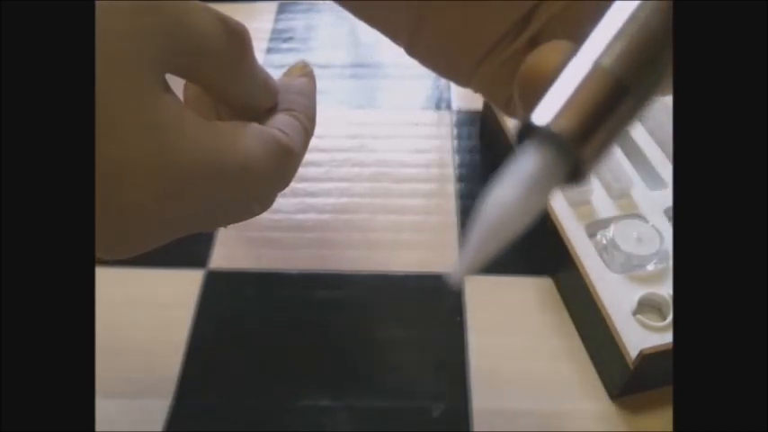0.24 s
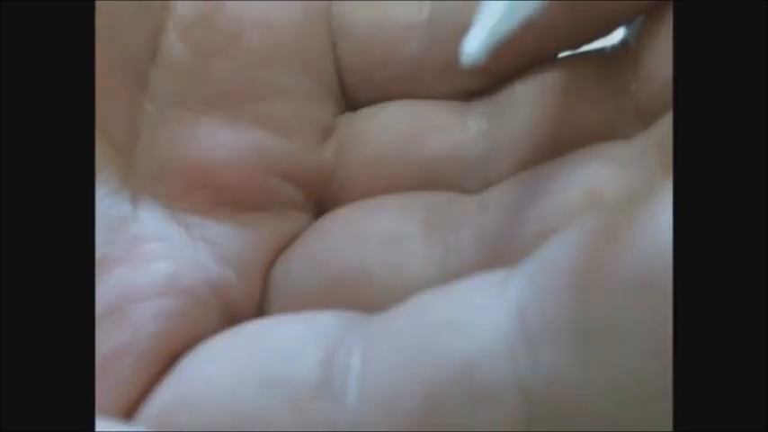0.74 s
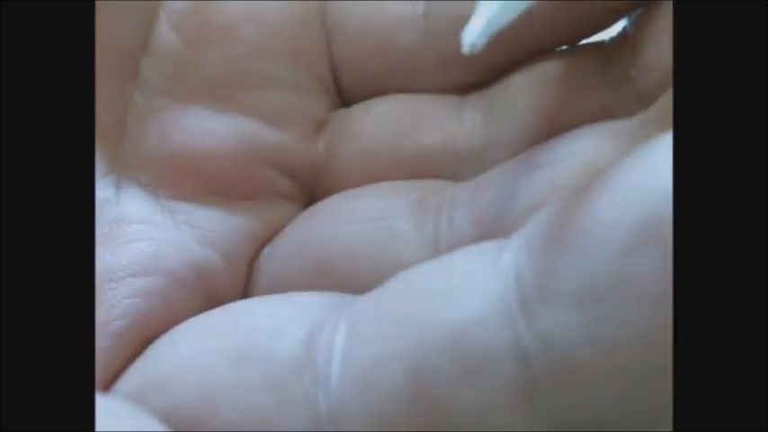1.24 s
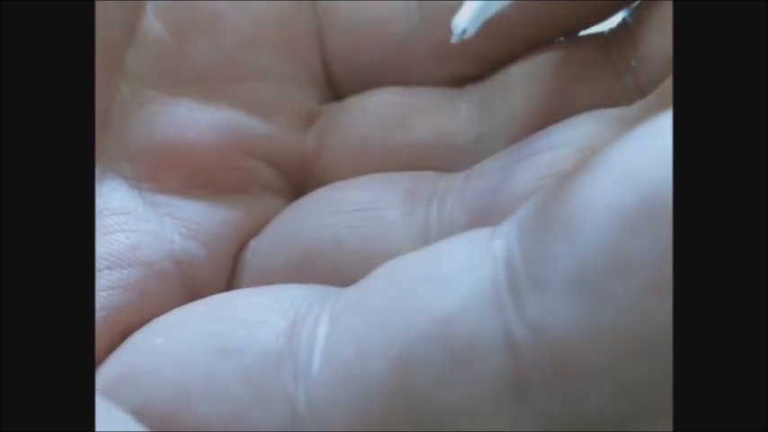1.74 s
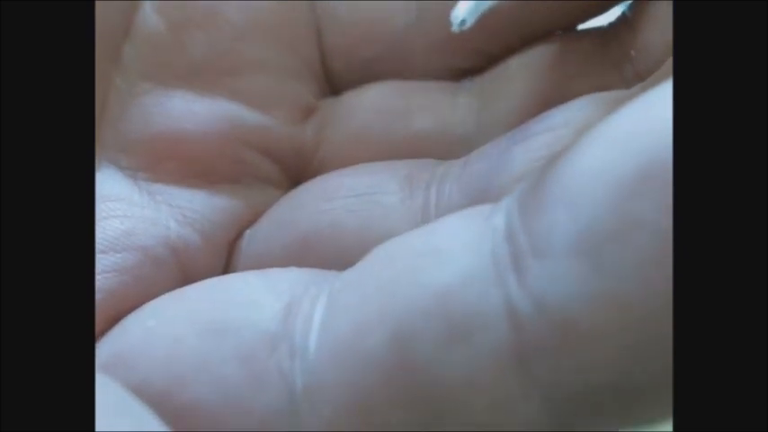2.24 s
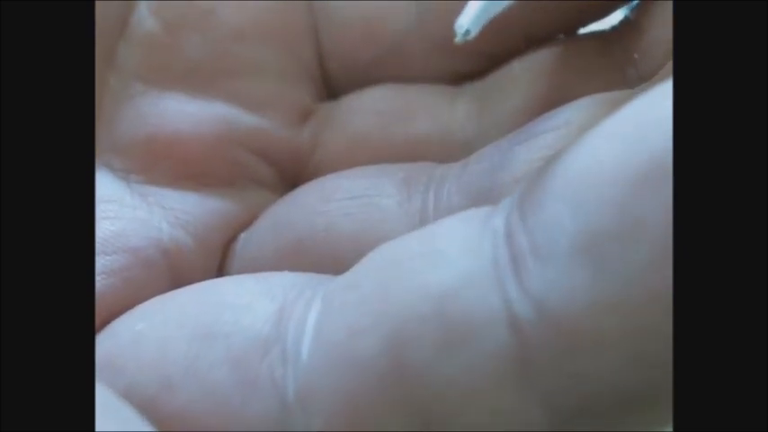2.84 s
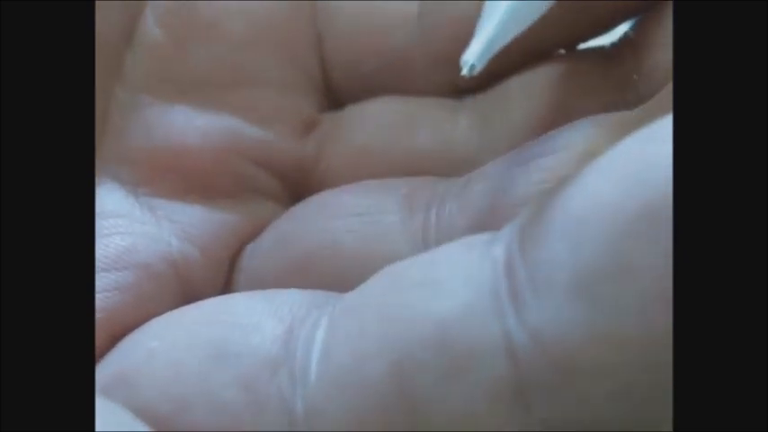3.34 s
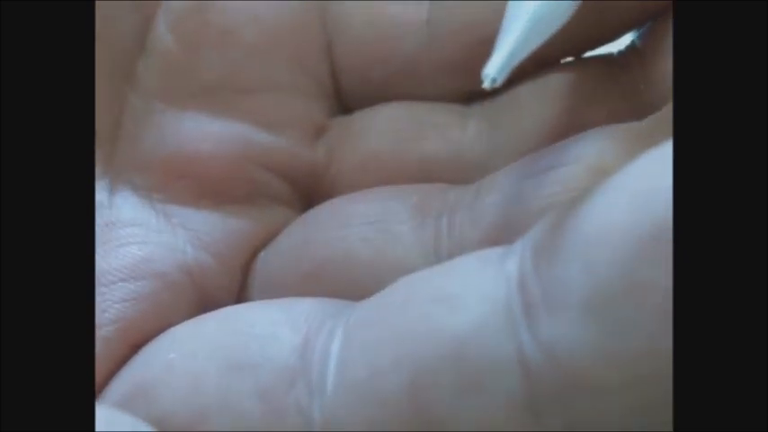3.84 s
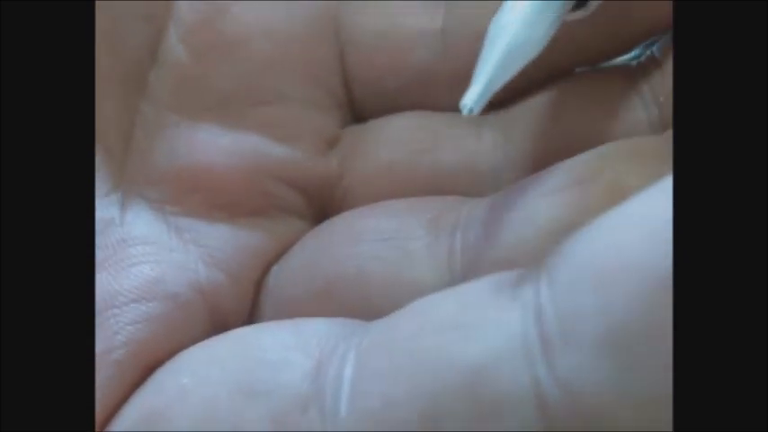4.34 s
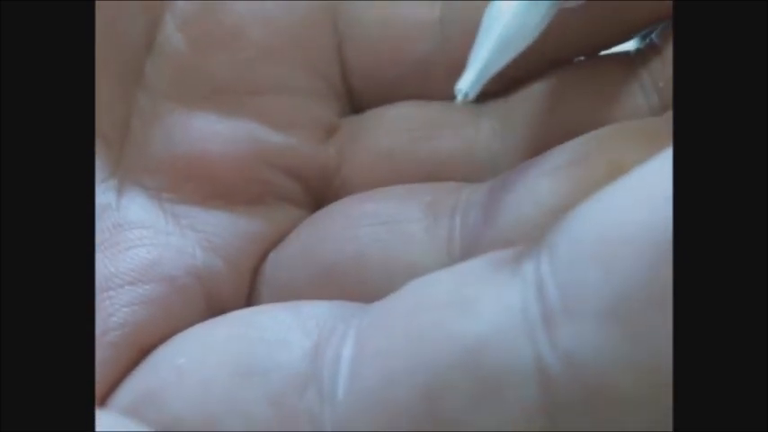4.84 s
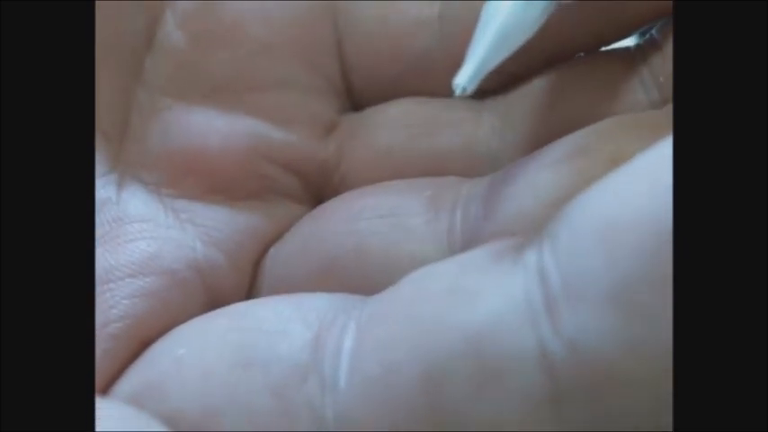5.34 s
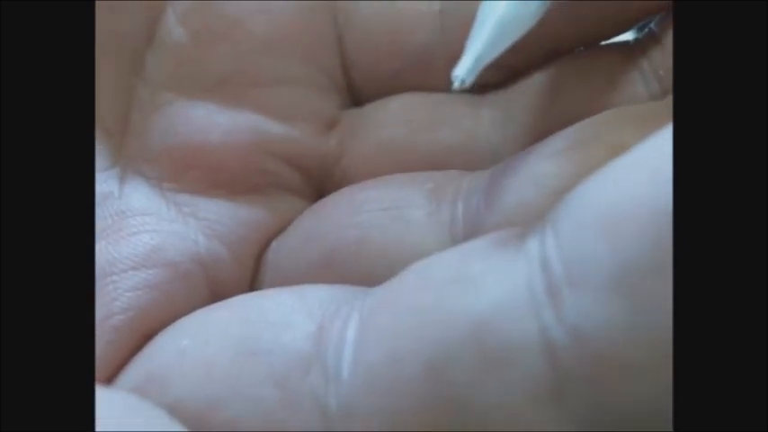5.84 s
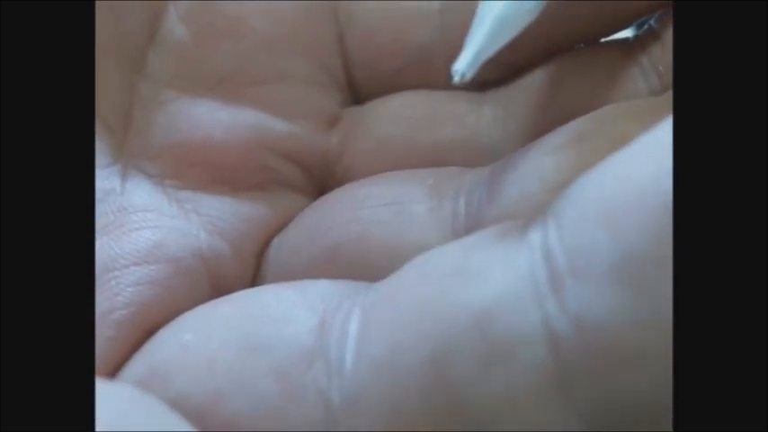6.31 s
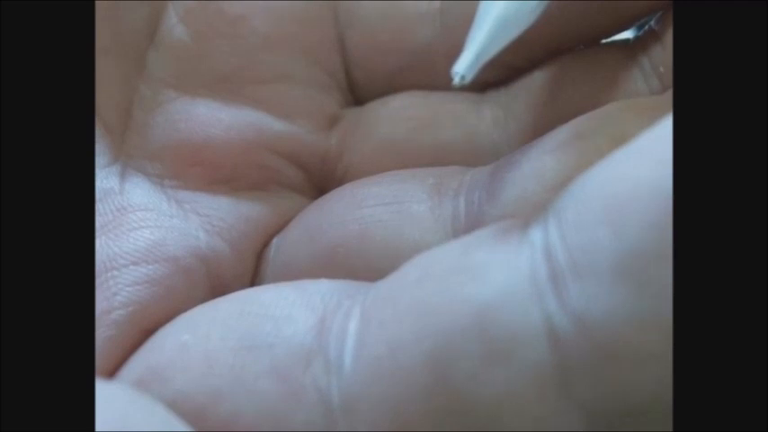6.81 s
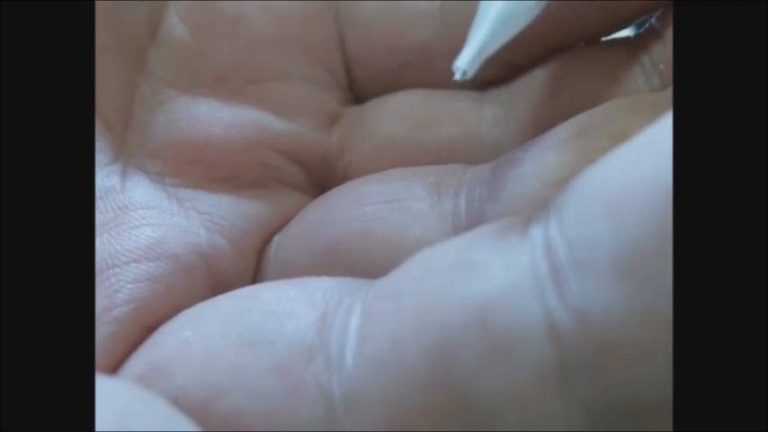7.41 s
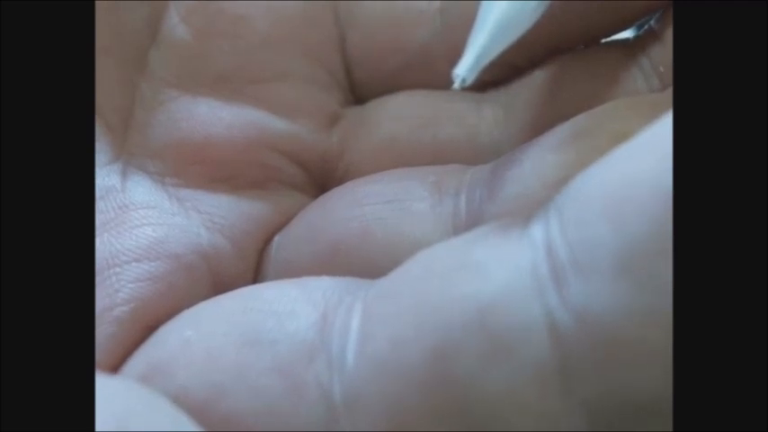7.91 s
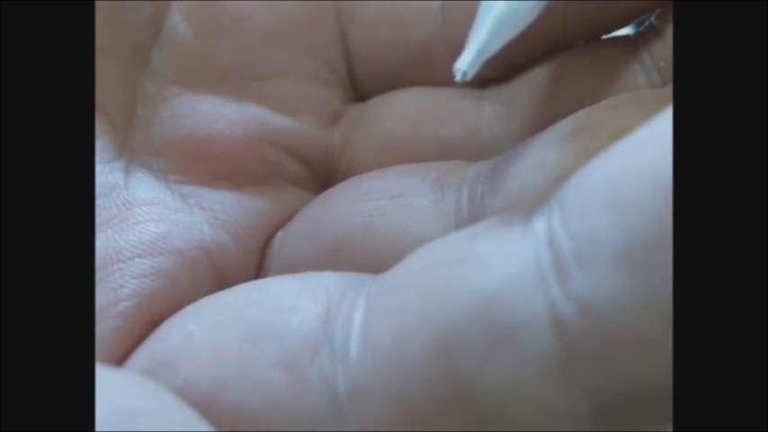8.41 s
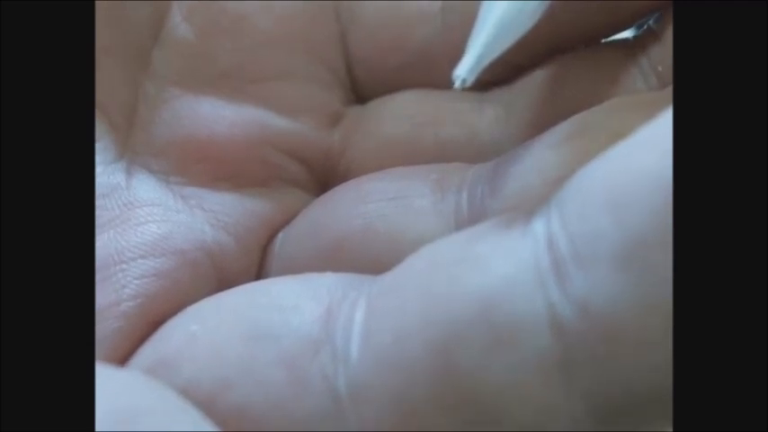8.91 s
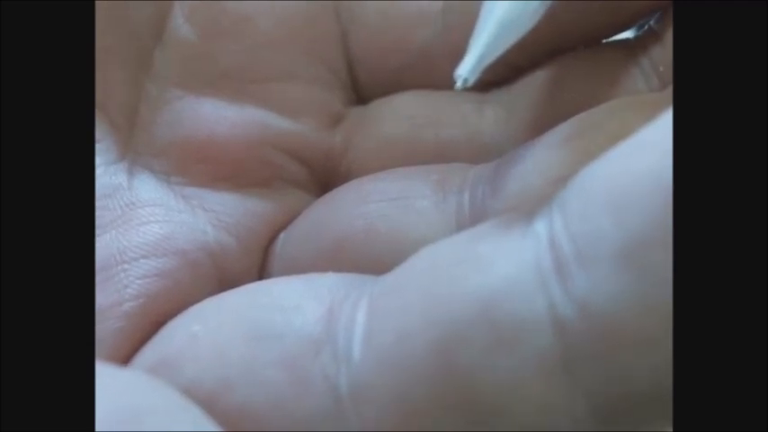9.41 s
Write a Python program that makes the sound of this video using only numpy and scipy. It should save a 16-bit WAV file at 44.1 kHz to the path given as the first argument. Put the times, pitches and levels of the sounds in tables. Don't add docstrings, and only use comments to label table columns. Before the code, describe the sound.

Thin, rattling motor buzz from a handheld pen machine, switched on and off abruptly in four runs over low indoor appliance hum.

```python
import sys
import numpy as np
from scipy import signal
from scipy.fft import rfft, irfft
from scipy.io import wavfile
from scipy.ndimage import uniform_filter1d

SR = 44100
rng = np.random.default_rng(int(sys.argv[2]) if len(sys.argv) > 2 else 0)


def invert_db(level):
    return 10 ** (np.asarray(level, dtype=float) / 20)


def to_wav(sig):
    pcm = np.clip(np.atleast_2d(sig), -1, 1) * 32767
    pcm = np.round(pcm).astype(np.int16)
    wavfile.write(sys.argv[1], SR, pcm.T)


N = 426006
TIME = np.arange(N) / SR

# on_s, off_s, spin_up_s, surplus_hz (extra cam speed of the rested motor), buzz_db
RUNS = [
    (.581, 1.52, .001, 1.25, -41.5),
    (1.910, 3.54, .025, 3.15, -41),
    (4.630, 7.69, .027, 2.6, -40),
    (7.963, 9.9, .029, 1.22, -40),
]


def rms_one(x):
    return x / np.sqrt(np.mean(x ** 2) + 1e-20)


def drift(rate):
    r = np.exp(-80 * np.pi * rate / SR)
    slow = signal.lfilter([1], [1, -2 * r, r * r], rng.standard_normal(N // 40 + 2002))[2000:]
    return np.interp(np.arange(N) / 40, np.arange(len(slow)), rms_one(slow))


def resonate(x, hz, width):
    r = np.exp(-np.pi * width / SR)
    gain = (1 - r * r) / 2
    ring = [1, -2 * r * np.cos(2 * np.pi * hz / SR), r * r]
    return signal.lfilter(np.array([1, 0, -1]) * gain, ring, x + 1e-18)


def coloured(spectrum):
    hz, level_db = np.transpose(spectrum)
    grid = np.maximum(np.fft.rfftfreq(N, 1 / SR), 1)
    shape = invert_db(np.interp(np.log(grid), np.log(hz), level_db))
    return rms_one(irfft(rfft(rng.standard_normal(N)) * shape, N))


def pen():
    # start_s, strength (against a plain knock)
    slack_knocks = [
        (.587, 0.87),
        (1.921, 1),
        (4.665, 1.1),
        (4.673, 0.76),
        (7.980, 0.1),
    ]
    cam_hz = 159.92
    surplus_hz, buzz_db, press = run_state()
    share = speed_share()
    turns = np.cumsum(share * (cam_hz + surplus_hz) * (1 + .0005 * drift(30))) / SR
    whole = np.round(turns).astype(int)

    strength, late = rng.standard_normal((whole.max() + 2, 2)).T
    strength = strength + .4 * (-1.) ** np.arange(len(strength))
    stroke = np.interp(turns, np.arange(len(strength)), strength)
    passed = turns - .003 * np.clip(late[whole], -3, 3) - whole > 0
    knocks = np.diff(passed * 1., prepend=1).clip(0)
    knocks *= invert_db(2.6 * np.minimum(strength[whole], 2)) * share ** 1.5
    knocks[[round(s * SR) for s, _ in slack_knocks]] = [size for _, size in slack_knocks]

    angle = 2 * np.pi * (turns - .03)
    swell = invert_db(2.5 * np.cos(angle) + 1.04 * np.cos(2 * angle) + 0.23 * stroke)
    lead_turns, hold_turns, fall_db_per_turn = .4, .5, 18.0
    past_hold = np.maximum((turns + lead_turns) % 1 - hold_turns, 0)
    slide = invert_db(0.81 * stroke - fall_db_per_turn * past_hold)
    grains = invert_db(2.0 * np.minimum(rng.exponential(1, (2, N)), 4)) * rng.standard_normal((2, N))
    grains *= invert_db(2.5 * (1 - share) * drift(160))
    rattles = np.vstack([rms_one(grains * stir * (share > 0)) for stir in (swell, slide)])

    tone = invert_db(-11) * orders(turns, stroke, surplus_hz, press, share) * share ** 2
    rattle = invert_db(-2.0) * rms_one(pen_body(knocks, rattles * share ** 2.02, TIME < 1.7))
    return invert_db(buzz_db) * (tone + rattle + shudder(grains[0], share))


def run_state():
    settle_s, press_s = .75, .1
    on, off, _, surplus_hz, buzz_db = np.transpose(RUNS)
    run = np.maximum(np.searchsorted(on, TIME) - 1, 0)
    surplus = surplus_hz[run] * np.exp(-np.maximum(TIME - on[run], 0) / settle_s)
    return surplus, buzz_db[run], np.clip(1 - (off[run] - TIME) / press_s, 0, 1)


def speed_share():
    coast_s = .093
    share = np.zeros(N)
    for on, off, rise, *_ in RUNS:
        up = 1 - np.exp(-np.maximum(TIME - on, 0) / rise)
        share += up * np.clip(1 - np.maximum(TIME - off, 0) / coast_s, 0, 1)
    return share


def orders(turns, stroke, surplus_hz, press, share):
    # order (multiple of cam speed), first_grip_db, second_grip_db, third_grip_db
    order_levels = [(1, -9, -9.5, -10), (2, -12, -12, -13.5), (4, -11.5, -12, -12.5), (6, -27, -16.5, -21),
                    (7, -21, -18, -17.5), (8, -5.5, -4, -4.5), (9, -11.5, -12.5, -12.5), (10, -5, -4.5, -6),
                    (11, -13, -20, -17), (12, 1.5, -12, -5), (13, -10, 1.5, -4), (14, -2, 0.8, 1.5),
                    (15, 0, 2, -2), (16, 0.5, -0.8, -2), (17, -6.5, -8.5, -11.5), (19, -5, -6, -5),
                    (20, -16.8, -11, -14), (21, -6, -7, -10), (22, 3, 3.2, 2), (23, -0.5, -2, -1.5),
                    (25, -4, -2.5, -6.5), (26, -19, -18, -4.5), (29, -6, -3, -4), (32, -2.5, -6, -2.5),
                    (37, -8, -12, -12), (39, -3, -11, -16), (41, -9, -8, -7), (43, -21, -20, -8),
                    (45, -12, -12, -2), (56, -1, -2, -9)]
    # start_s, grip (number from 0)
    grips = [
        (0, 0),
        (1.3, 1),
        (2.9, 0),
        (3.27, 1),
        (4, 2),
    ]
    since, grip = np.transpose(grips)
    grip = grip.astype(int)[np.searchsorted(since, TIME, "right") - 1]
    held = uniform_filter1d(np.eye(3)[grip].T.copy(), size=4000, axis=1)
    out = np.zeros(N)
    lean = rng.normal(0, .2, 30)
    for (k, *grip_db), lag in zip(order_levels, lean):
        k = round(k)
        level_db = np.dot(grip_db, held)
        if k == 12:
            free_db = level_db + 0.5 * surplus_hz + 1 * drift(3.3)
            press_db = 3
            level_db = free_db + press * (press_db - free_db)
        if 11 < k < 18:
            lag += -0.6 * np.arctan((k - 14.6) / 0.38)
        else:
            lag += (1.1 if k > 17 else np.pi / 2) * (k % 2)
        halves = 1 + .2 * np.cos(np.pi * turns + 3 * lag) if k > 13 else 1
        level = invert_db(level_db + 1.0 * drift(1.6) - 2.2 * k * (1 - share))
        out += halves * level * np.cos(2 * np.pi * k * turns + lag)
    return out * invert_db(0.13 * stroke)


def pen_body(knocks, rattles, first):
    # pitch_hz, width_hz, knock_db, rattle_db
    body_near = [(1900, 230, -21, -36), (2670, 250, 5, 1.5), (3830, 460, -22, -1.5), (4860, 1130, 5, -3.5),
                 (6720, 650, -7, 1.5), (6940, 1000, 7.5, -18), (8700, 630, 6, -4), (10120, 1050, -12, -2.5),
                 (11800, 620, -10, -17), (13700, 4300, -18, -15), (15200, 970, -18, -10),
                 (9300, 120, -10, -17)]
    # pitch_hz, width_hz, knock_db, rattle_db
    body_held = [(2140, 230, -7, -15), (2587, 265, -30, -0.5), (4000, 1100, -54, -2.5),
                 (5230, 550, 5.5, -3), (6935, 560, 14, 0), (7510, 2100, 9, -30), (8830, 1330, -22, -3.5),
                 (10280, 1130, -6, -3.5), (11700, 210, -5, -1.5), (12300, 420, -16, -30),
                 (15750, 460, -16, -7), (8900, 64, -18, -4)]
    out, blows = np.zeros(N), np.flatnonzero(knocks)
    for body, grip in ((body_near, first), (body_held, ~first)):
        for k, (hz, width, knock_db, rattle_db) in enumerate(body):
            drive = invert_db(rattle_db) * rattles[k % 2 + 2 * (hz > 8400)]
            spread_db = rng.normal(0, 1.9, len(blows))
            drive[blows] += invert_db(knock_db + 12 + spread_db) * knocks[blows]
            out += (-1) ** k * resonate(drive * grip, hz, width)
    band = signal.butter(3, [1900, 14000], "band", fs=SR, output="sos")
    return signal.sosfilt(band, out)


def shudder(grains, share):
    hz, width_hz, level_db = 2300, 1300, -13
    shaking = rms_one(resonate(resonate(grains, hz, width_hz), hz, width_hz))
    return invert_db(level_db) * shaking * 7 * share ** 2 * (1 - share)


def ticks():
    # start_s, peak_db, crack_hz, crack_width_hz
    taps = [
        (4.1428, -44, 2400, 2000),
        (7.8348, -46, 6960, 6000),
    ]
    # low_hz, low_t60_s (time to fall 60 dB), upper_hz, upper_t60_s
    rings = [
        (1030, 0.043, 4500, 0.0077),
        (2690, 0.046, 2980, 0.018),
    ]
    out = np.zeros(N)
    for (s, peak_db, crack_hz, width), (hz, t60, upper_hz, upper_t60) in zip(taps, rings):
        age = np.maximum(TIME - s, 0)
        noise = resonate(resonate(rng.standard_normal(N), crack_hz, width), crack_hz, width)
        crack = 0.5 * rms_one(noise) * np.exp(-age / 0.0018)
        low = 0.6 * np.sin(2 * np.pi * hz * age) * invert_db(-60 * age / t60)
        upper = .5 * np.sin(2 * np.pi * upper_hz * age) * invert_db(-60 * age / upper_t60)
        out += invert_db(peak_db) * (TIME > s) * (low + upper + crack)
    bump_s, bump_db, bump_width_s = 7, -43, .0006
    return out - invert_db(bump_db) * np.exp(-.5 * ((TIME - bump_s) / bump_width_s) ** 2)


def room():
    # pitch_hz, level_db (per Hz)
    early_noise = [(12, -29.5), (20, -9.5), (32, -15), (86, -28.5), (198, -18), (285, -30), (410, -22.5),
                   (573, -24), (641, -29), (825, -28.5), (1220, -33), (1440, -31.5), (5370, -44.5),
                   (8170, -47), (16000, -61)]
    # pitch_hz, level_db (per Hz)
    later_noise = [(12, -34), (20, 6), (27, -11), (91, -7), (120, -12.5), (187, -14.5), (641, -18),
                   (738, -17), (802, -18.5), (1000, -18), (1190, -20.5), (1810, -22.5), (3730, -33.5),
                   (7950, -39), (16000, -62)]
    # pitch_hz, width_hz, level_db (against the room noise)
    bands = [(456, 58, -11.5), (176.5, 53, -8), (7970, 600, -18.5), (14600, 3000, -31), (9300, 760, -21),
             (4940, 550, -20.5)]
    # pitch_hz, early_db, wobble (share of the pitch)
    hum = [(735, -71, .002), (1480, -82, .002), (8000, -83, .0002)]
    hum_later = [-65, -77, -105]
    early_db, later_db = -58.5, -57.5
    early = TIME < RUNS[0][0]
    out = np.where(early, invert_db(early_db) * coloured(early_noise), invert_db(later_db) * coloured(later_noise))
    for hz, width, band_db in bands:
        out += invert_db(later_db + band_db) * ~early * rms_one(resonate(rng.standard_normal(N), hz, width))
    for (hz, tone_early_db, wobble), tone_later_db in zip(hum, hum_later):
        cycles = np.cumsum(hz * (1 + wobble * drift(3.08))) / SR
        level_db = np.where(early, tone_early_db, tone_later_db) + 3 + 0.7 * drift(2)
        out += invert_db(level_db) * np.sin(2 * np.pi * cycles)
    return out


def scene():
    return (pen() + ticks() + room())[None]


def roll_off(x):
    return signal.sosfilt(signal.butter(12, 16140, fs=SR, output="sos"), x)


def record(dry):
    cutoff_hz, offset = 15730, .00385
    cut = signal.sosfilt(signal.ellip(16, .5, 95, cutoff_hz, fs=SR, output="sos"), dry)
    return roll_off(cut + offset)


dry = scene()
out = record(dry)
to_wav(out)
```